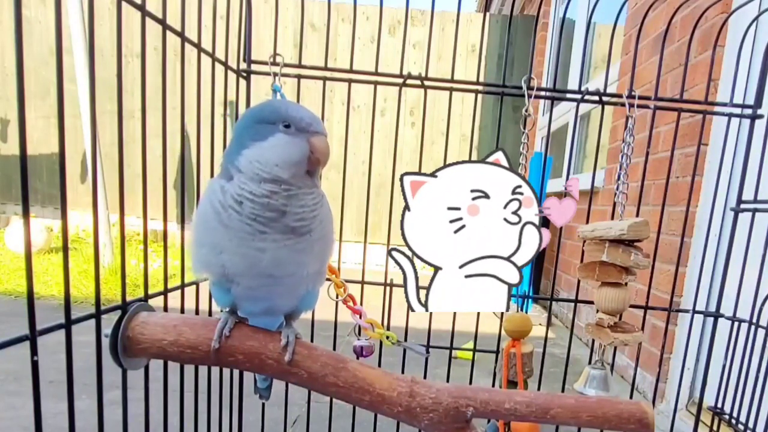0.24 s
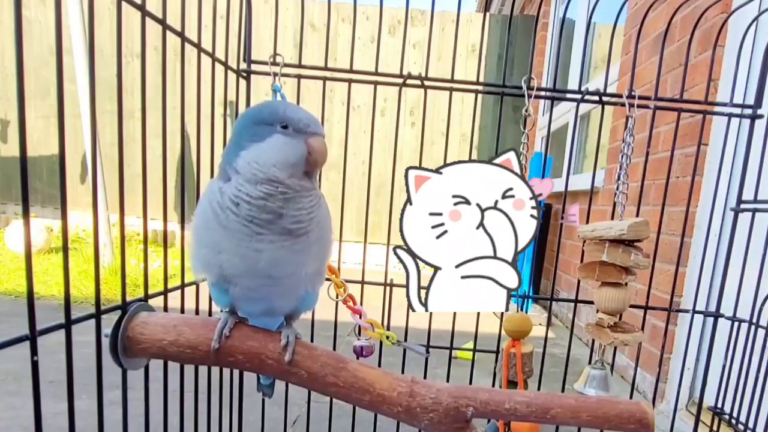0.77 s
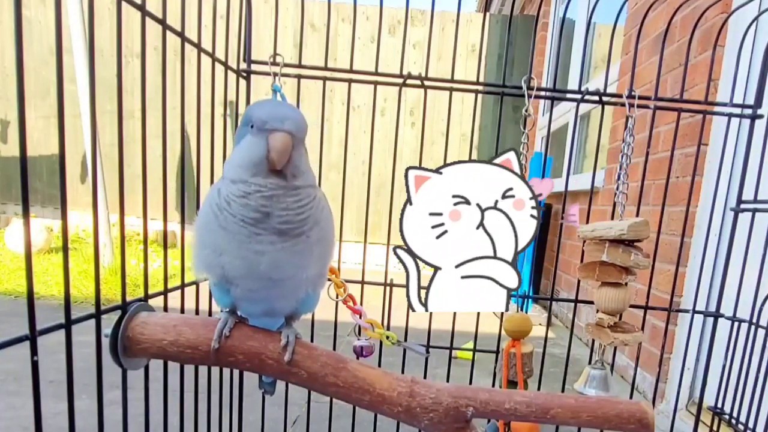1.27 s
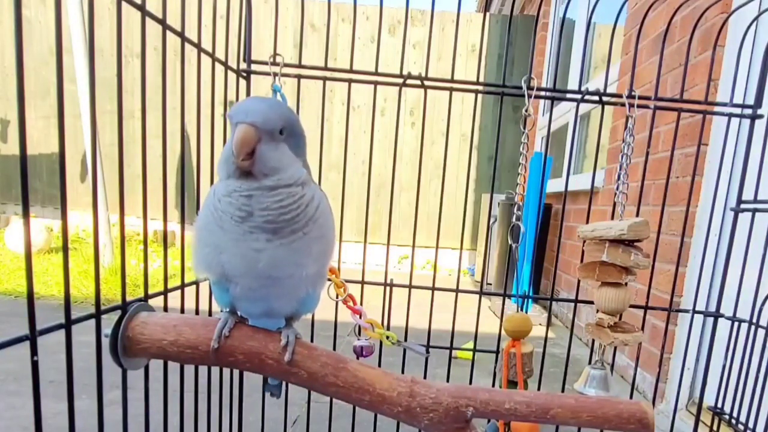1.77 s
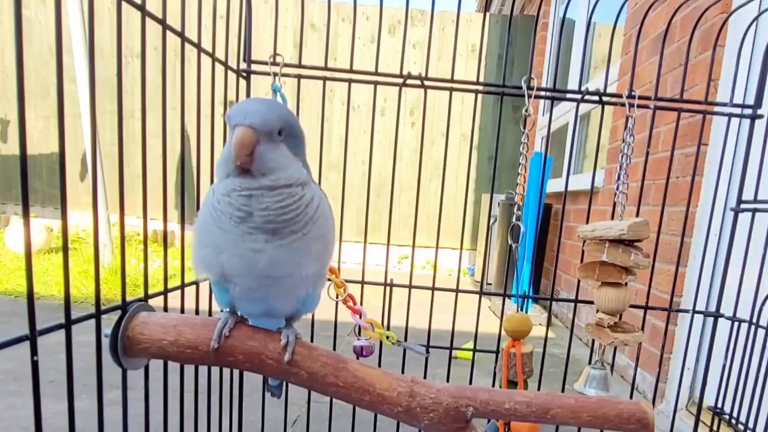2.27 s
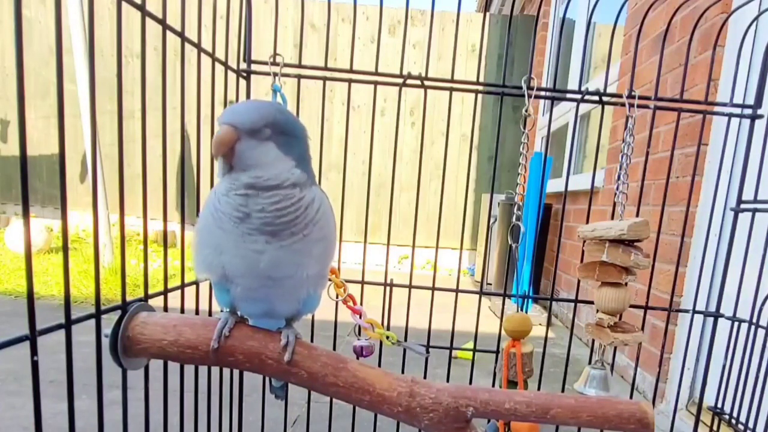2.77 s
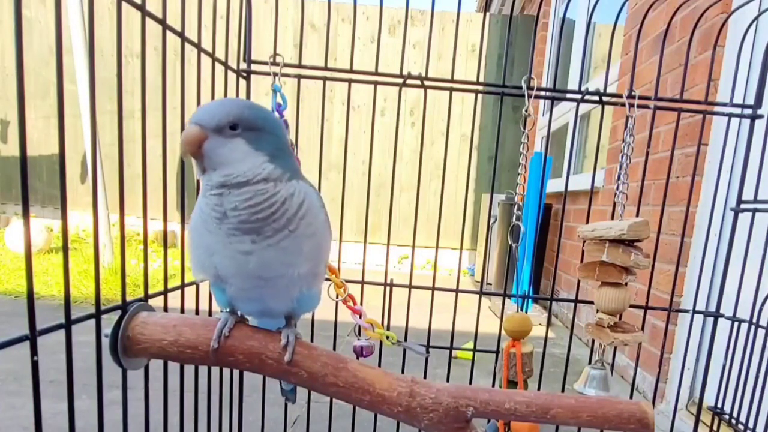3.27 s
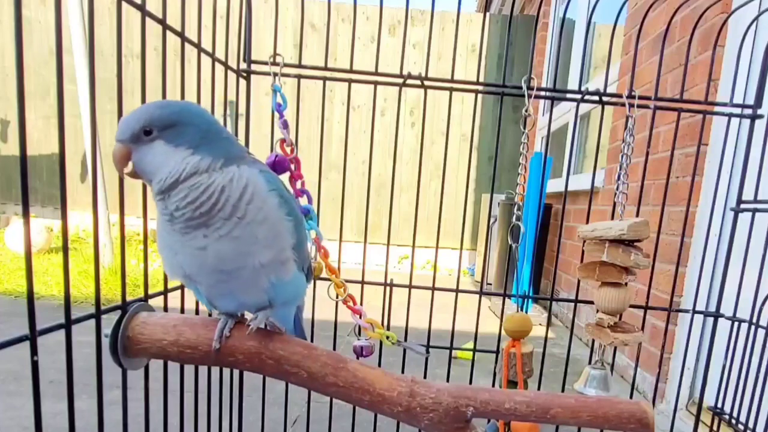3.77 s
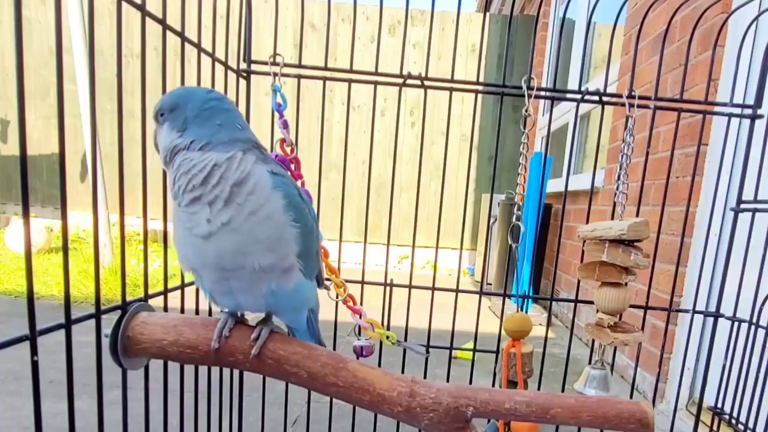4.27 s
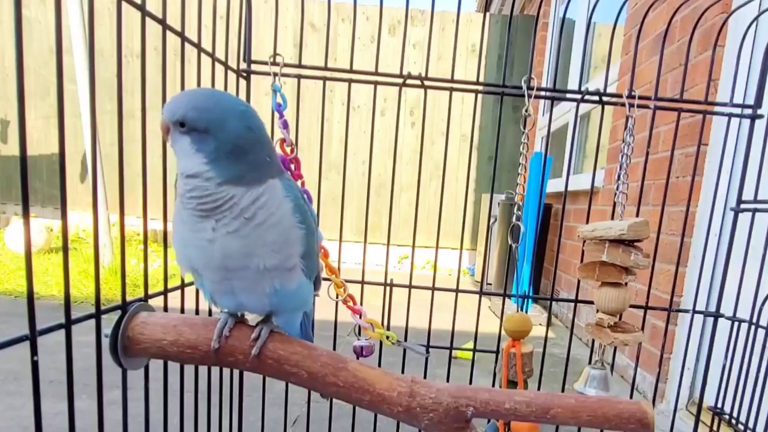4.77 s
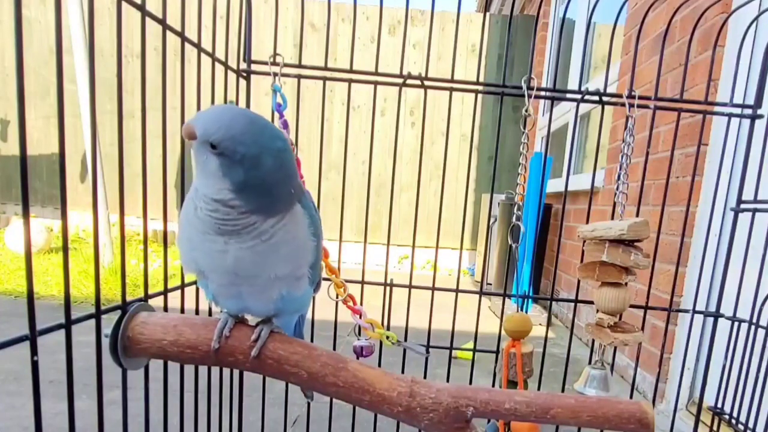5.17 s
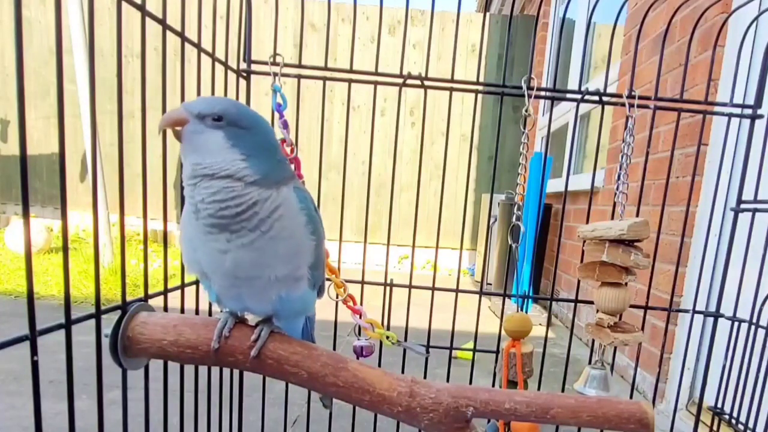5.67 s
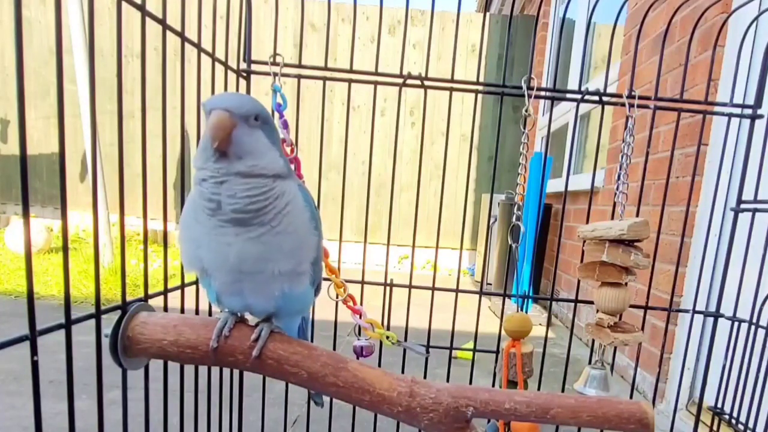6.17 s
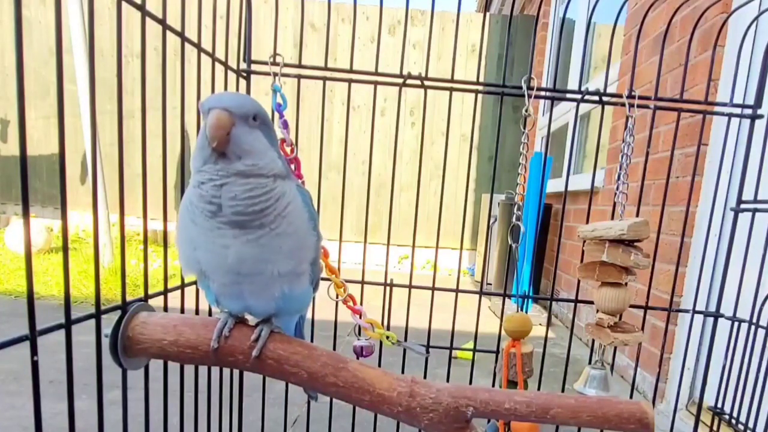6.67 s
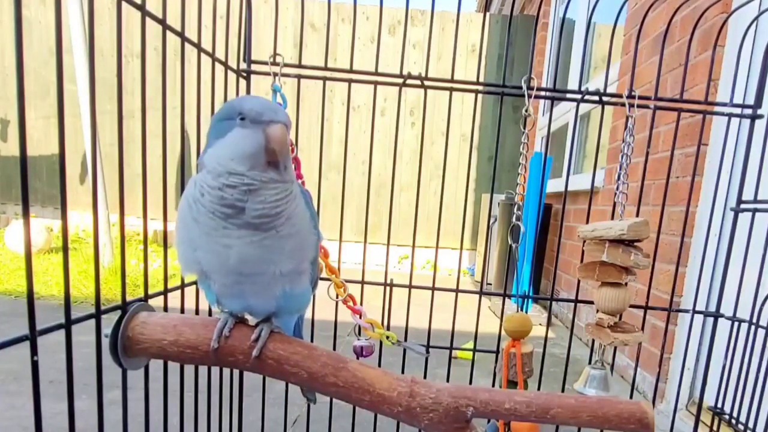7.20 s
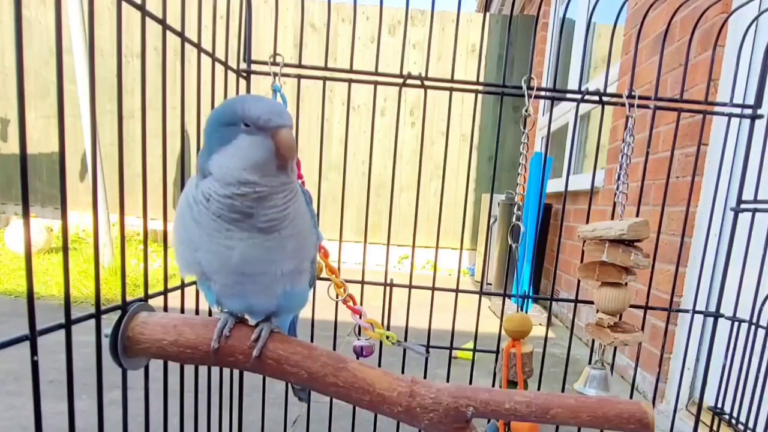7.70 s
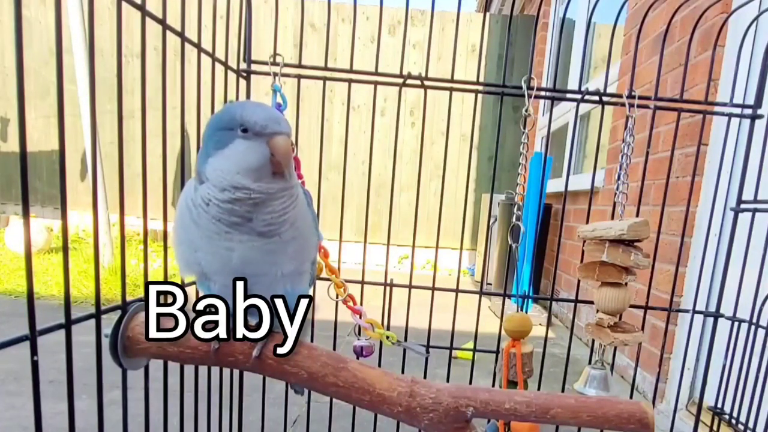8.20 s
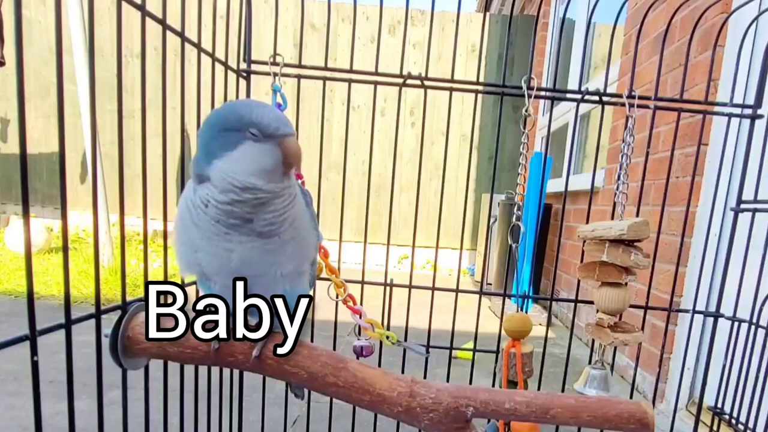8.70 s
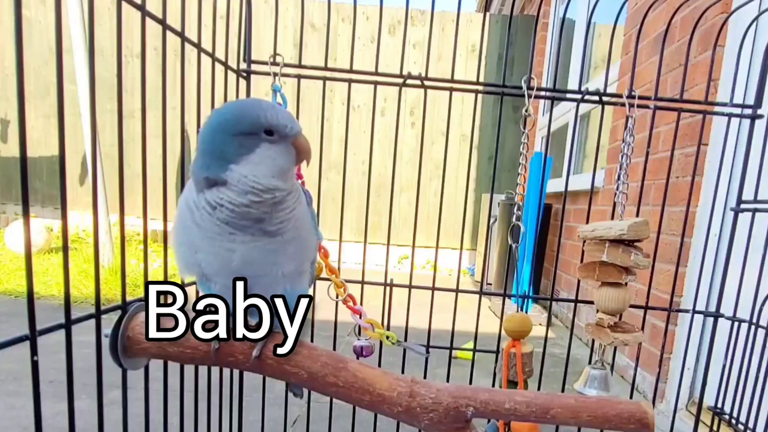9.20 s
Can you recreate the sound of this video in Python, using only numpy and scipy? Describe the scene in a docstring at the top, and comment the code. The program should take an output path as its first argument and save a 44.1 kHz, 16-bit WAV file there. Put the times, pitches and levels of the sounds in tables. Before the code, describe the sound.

A small parrot in an outdoor cage gives a few quick squawks, pauses, then chatters rapidly with raspy notes and beak clicks, ending in a rising call. Sparser squawks, an arched call and a few late croaks follow. A low rumble and wavering far engine lie beneath, with faint whistling birds. Close stereo microphone, bird toward the left, slight yard echo.

```python
"""A low rumble and a far engine open the scene, and at once a small parrot squawks close by.
It chatters, rasps and clicks its beak in a garden cage; the walls of the yard answer faintly.
The voice is a train of harmonics and puffs of noise, filtered by throat, tongue and beak.
The engine is a stack of wavering sines that slows and revs again; the rumble is coloured noise.
Other birds, mostly falling whistles, come from far off, and soft swishes of noise are rustles."""
import sys
import numpy as np
from scipy import signal
from scipy.fft import rfft, irfft, next_fast_len
from scipy.io import wavfile
from scipy.ndimage import uniform_filter1d, map_coordinates

SR = 44100
rng = np.random.default_rng(int(sys.argv[2]) if len(sys.argv) > 2 else 0)


def file_out(sig):
    """Save sig as 16-bit WAV at sys.argv[1]."""
    # one column per channel
    cols = np.atleast_2d(sig).T
    # limit, then scale
    lim = np.clip(cols, -1, 1)
    pcm = np.round(lim * 32767).astype(np.int16)
    wavfile.write(sys.argv[1], SR, pcm)


N = 416744
TIME = np.arange(N) / SR
BAND_LIMIT_HZ = 16200

# colour of the background noise, only its shape counts: f/Hz, level per Hz/dB
BACKGROUND_COLOUR = [(15, -40.5), (25, -22.5), (54, 5.5), (90, -7), (167, -9.5), (196, -15.5), (301, -12.5),
                     (529, -27), (15000, -68.5)]
# level of the background's shared part, before the left-right balance: t/s, level/dB
BACKGROUND_LEVEL = [(0, -44), (3, -47.5), (4.8, -44), (6.6, -53), (7.7, -48.5)]
# far engine, before the left-right balance:
# t/s, firing rate f/Hz, fundamental level/dB, overtones level/dB before the exhaust
ENGINE = [(0, 82.23, -51.5, -74), (1.4, 67, -45, -48.5), (1.95, 64.93, -32.5, -53), (2.65, 60.03, -37, -40),
          (3.3, 56.92, -39, -46), (3.9, 54.1, -60, -51.5), (8.35, 58.12, -54, -58.5),
          (8.55, 48.44, -37, -36), (8.8, 54.64, -51.5, -46), (9.1, 48.9, -54.5, -45),
          (9.33, 62.24, -46, -38)]
# the exhaust's colouring of the overtones: f/Hz, level/dB
EXHAUST = [(100, -4.5), (122, 1), (140, -5.5), (165, -3.5), (195, -11), (260, -16), (430, -29.5)]
# throat and beak for notes, long calls and clicks, only the shape counts: f/Hz, level/dB
THROAT = [(300, -1.5), (600, -3.5), (1000, 0), (1500, 0), (2200, 0), (4200, -1), (5200, -7.5),
          (6300, -17.5), (8000, -5.5), (10000, -16), (12000, -8), (13800, -22.5), (16000, -27.5)]
# tongue and neck: t/s, tongue resonance f/Hz, stretch of the throat's resonances/factor
TONGUE = [(.4, 3400, 1.075), (1.6, 3030, 1.05), (2.4, 3130, 1.0), (2.7, 2300, .98), (3.2, 2340, 1.0),
          (3.8, 2300, 0.93), (4.3, 2284, 0.82), (4.79, 4660, 0.98), (4.84, 2200, 0.92), (5.37, 4330, .97),
          (5.43, 1690, 0.92), (5.68, 1821, 1.07), (6.27, 4100, 1.02), (6.33, 2200, 0.86),
          (7.9, 4300, 1.014), (8, 2682, 1.01)]
# short voiced notes, level at the crest: start t/s, swell t/s, fade t/s,
# start f/Hz, middle f/Hz, end f/Hz, level/dB, settled roughness/0-1,
# body (under about 2 kHz) level/dB, edge (over about 6 kHz) level/dB
NOTES = [ (0.002, 0.0072, 0.016, 1614, 1073, 700, -36.5, 0.17, 14, 8.5),
         (0.207, 0.014, 0.019, 1068, 1436, 614, -26, 0.25, 12, 8),
         (0.400, 0.007, 0.017, 1442, 1039, 580, -22.5, 0.45, 6.5, 8.5),
         (0.555, 0.013, 0.0074, 1626, 1574, 2280, -27.5, 0, 18, -2),
         (1.479, 0.02, 0.035, 726, 818, 865, -31.5, 0.07, 7.5, -5),
         (1.616, 0.025, 0.016, 957, 1064, 1031, -18.5, 0.25, 2, 5),
         (1.753, 0.02, 0.024, 1259, 911, 796, -18, 0.19, 4, 7.5),
         (1.895, 0.027, 0.0075, 511, 635.4, 646, -21.5, 0.43, 3.5, 2.5),
         (2.094, 0.019, 0.027, 822, 716, 616, -25, 0.4, 9.5, 1),
         (2.224, .023, 0.0073, 684, 736, 674, -13, .2, -13, -1),
         (2.398, 0.017, .025, 890, 790, 723, -27, 0.3, 12, 7),
         (2.535, 0.022, 0.0087, 755, 815, 880, -22.5, 0.09, 4.5, 5.5),
         (2.665, 0.0093, 0.03, 1171, 1098, 692, -12, 0.21, -15, .5),
         (2.812, 0.034, 0.011, 631, 709, 686, -25.5, 0.2, 3.5, 4),
         (2.966, 0.0096, 0.028, 679, 629, 556, -21, 0.7, -8, 0),
         (3.794, 0.0045, .020, 1653, 1306, 505, -16.5, 0.38, -2.5, -3.5),
         (4.255, 0.033, .094, 1340, 726, 468.5, -24.5, 0.25, 2, -21),
         (4.603, 0.031, 0.018, 331, 382.3, 345, -28.5, 0.52, 0, -2.5),
         (4.839, 0.0099, 0.081, 708, 603, 531, -29.5, 0.2, 15, 4.5),
         (5.016, 0.045, 0.0077, 491, 572, 573, -31, 0.42, 12.5, 1.5),
         (6.259, 0.04, 0.037, 823, 749, 660, -14, 0.08, -12, -14.5),
         (6.348, 0.022, 0.028, 550.5, 521, 456, -23, 0.17, -5, -10),
         (7.872, 0.011, .032, 301, 215.3, 190, -27.5, 0.93, -2, -6),
         (7.969, 0.013, 0.042, 400.6, 354.7, 278.8, -17, 0.47, -11.5, -4), ]
# where the head points: t/s, lag of the right microphone/ms, left-right level/dB
HEAD = [(0, 0.27, 2), (2.5, 0.27, 7.5), (4.3, 0.34, 4.5), (6.3, 0.29, 9.5), (8, 0.27, 5)]
# how long the yard rings: f/Hz, t60/s
YARD_T60 = [(500, 1.23), (2500, 0.34), (8000, 0.76), (15000, 0.2)]
# colour of the yard's ring, only the shape counts: f/Hz, level/dB
YARD_COLOUR = [(400, 4), (1300, -7.5), (2600, 3), (4500, -1), (7000, -10), (15000, -7)]
# clicks of beak and tongue: t/s, level/dB before a common trim, ring f/Hz
CLICKS = [(0.195, -36, 1900), (0.552, -19.5, 3140), (0.585, -28, 2090), (1.48, -16.5, 774),
          (1.597, -15.5, 1007), (1.744, -14.5, 4190), (2.043, -22.5, 4253), (2.21, -13.5, 2203),
          (2.976, -22.5, 1655), (3.798, -17, 2314), (5.081, -15, 2260), (7.861, -29.5, 2040),
          (7.873, -16.5, 4340)]
# far birds, one call each, level before echoes and mix:
# t/s, length/s, start f/Hz, end f/Hz, level/dB
FAR_BIRDS = [(0.844, 0.19, 4660, 3060, -58.5), (3.642, 0.16, 5360, 5500, -69.5),
             (7.021, .1, 5080, 3915, -72.5), (7.494, .17, 4480, 3156, -55.5),
             (8.31, 0.14, 5500, 4800, -67.5), (8.456, 0.14, 4574, 3216, -52.5),
             (9.349, 0.12, 5044, 4300, -65.5)]
# rustles of feathers and feet: t/s, length/s, low f/Hz, high f/Hz, level/dB
RUSTLES = [(1, 0.24, 580, 2100, -58), (4.499, 0.48, 145, 480, -45.5), (8.643, 0.43, 3104, 15100, -68)]
# shrill falling rasps, level at the crest: start t/s, swell t/s, fade t/s,
# from f/Hz, to f/Hz, level/dB, settled roughness/0-1, edge level/dB
RASPS = [ (2.069, 0.0038, .028, 2157, 1462, -17, 0.56, -8.5),
         (2.351, 0.011, 0.027, 3168, 2132, -15, 0.77, -4), (2.658, 0.003, 0.012, 3800, 3600, -12, 0.5, 1),
         (4.785, .037, .026, 2700, 1990, -21, 0.49, -5.5), (5.347, .024, .006, 3384, 2815, -27.5, .3, -11),
         (5.373, .004, .052, 2255, 1840, -16.5, 0.49, -11.5), ]
# throat and beak as set for a rasp, only the shape counts: f/Hz, level/dB
RASP_THROAT = [(300, -30), (1200, -11), (2200, 0.5), (4200, -2.5), (5200, -3), (6400, -9.5), (8000, -10.5),
               (10000, -16.5), (12000, -16), (13500, -29.5), (16000, -31)]
# drawn-out rising call: t/s, pitch f/Hz, body (under about 2 kHz) level/dB
RISING = [(3.005, 572, -5.5), (3.027, 541, 1.5), (3.049, 447, -4.5), (3.093, 502.4, -6.5),
          (3.127, 715, -10), (3.151, 779, -1), (3.177, 1106, -1.5), (3.209, 1124, 0), (3.236, 1103, -2.5)]
# drawn-out arched call: t/s, pitch f/Hz, body (under about 2 kHz) level/dB
ARCHED = [(5.415, 708, 9.9), (5.425, 787, 4.3), (5.437, 878, 11.6), (5.547, 920, 16.3), (5.569, 961, 8.4),
          (5.607, 959, 10.3), (5.643, 941.4, 9.3), (5.703, 837, 13), (5.719, 808, 8.5), (5.761, 572, 4.5),
          (5.78, 567, 11)]
# voices of the long calls: curve, level/dB, full strength above f/Hz,
# slope under that pitch/dB per octave, release t/s, settled roughness/0-1, edge level/dB
LONG_CALLS = [(RISING, -18, 765, -25.5, 0.052, .13, -2.8), (ARCHED, -20, 920, -25.5, 0.01042, 0.016, 8.8)]

# the syrinx starts with extra roughness (0-1) that decays away
ONSET_ROUGH, SETTLE_S = 0.25, .012
# a softer voice is rounder: dB of body per dB below the crest
ROUNDING = 1
# a syllable swells up to its crest and sinks again, along these powers of time
SWELL_DB_PER_S, SWELL_POWER, FADE_DB, FADE_POWER = -520, 1.4, -8, 1.4


def gain_of(db):
    """Decibels to amplitude."""
    return 10 ** (np.asarray(db) / 20)


def evened(x):
    """Scaled to rms 1."""
    return x / np.sqrt(np.mean(x ** 2) + 1e-20)


def read(points, hz):
    """A spectrum's value at hz, on a log-frequency axis."""
    f, value = np.transpose(points)
    return np.interp(np.log(hz + 1), np.log(f + 1), value)


def follow(rows, t):
    """Every column of a curve table at the times t."""
    s, *columns = np.transpose(rows)
    return [np.interp(t, s, column) for column in columns]


def add(mix, s, sound):
    """Mixes a sound in at s seconds."""
    part = mix[max(round(s * SR), 0):][:len(sound)]
    part += sound[:len(part)]


def lowpass(x, hz):
    """Smooth low-pass without delay."""
    size = next_fast_len(len(x) + 256)
    rolloff = 1 + (np.fft.rfftfreq(size, 1 / SR) / hz) ** 8
    return irfft(rfft(x, size) / rolloff, size)[:len(x)]


def wobble(size, hz):
    """Random motion of rms 1, mostly slower than hz."""
    return evened(lowpass(rng.standard_normal(size), hz))


def ringing(points, size=2048):
    """The causal, minimum-phase impulse response that has this spectrum."""
    log_gain = np.log(gain_of(read(points, abs(np.fft.fftfreq(size, 1 / SR)))))
    spectrum = np.exp(np.conj(signal.hilbert(log_gain)))
    return np.fft.ifft(spectrum).real[:size // 2]


def background(apart_db=-12):
    """Rumble of distant roads, nearly alike at both microphones, thinning out to a faint hiss."""
    colour = ringing(BACKGROUND_COLOUR, size=16384)

    def coloured_noise():
        """White noise through the background's colour."""
        return evened(signal.fftconvolve(rng.standard_normal(N), colour)[:N])

    shared, left, right = (coloured_noise() for _ in range(3))
    level = gain_of(follow(BACKGROUND_LEVEL, TIME)[0])
    return level * (shared + gain_of(apart_db) * np.array([left, right]))


def engine(waver=.008, flutter=0.36, count=7):
    """A far drone: a fundamental and overtones shaped by the exhaust, each wavering on its way."""
    hz, low_db, upper_db = follow(ENGINE, TIME)
    turns = np.cumsum(hz * (1 + waver * wobble(N, 14))) / SR
    drone = np.zeros(N)
    for k in range(1, count + 1):
        db = low_db if k == 1 else upper_db + read(EXHAUST, k * hz)
        level = gain_of(db) * (1 + flutter * wobble(N, 7))
        drone += level * np.sin(2 * np.pi * (k * turns + rng.random()))
    return drone


def resonate(x, hz, width_hz):
    """A moving resonance of gain 1: shifts the curve hz down to zero, smooths, and shifts back."""
    turn = np.exp(2j * np.pi * np.cumsum(hz) / SR)
    r = np.exp(-np.pi * width_hz / SR)
    smoothed = signal.lfilter([1 - r], [1, -r], x / turn)
    return 2 * (turn * smoothed).real


def syrinx(hz, rough, jitter=0.17, jitter_hz=700, breath=1.0, least_air=.02, spread_turns=0.18):
    """Harmonic pulses; a rough voice has uneven cycles and more puffs of air, one per cycle."""
    size = len(hz)
    turns = np.cumsum(hz * (1 + jitter * rough * wobble(size, jitter_hz))) / SR
    k = np.arange(1, BAND_LIMIT_HZ // hz.min() + 1)[:, None]
    # the windpipe smears each pulse: its upper harmonics come out a little later
    lag_turns = spread_turns * (k * hz / 1000) ** 1.5
    harmonics = np.cos(2 * np.pi * (k * turns - lag_turns)) * (k * hz < BAND_LIMIT_HZ)
    pulses = evened(harmonics.sum(0) * np.sqrt(hz))
    puffs = evened((0.35 + np.exp(-(turns % 1) / .25)) * rng.standard_normal(size))
    puffs -= lowpass(puffs, 1.4 * np.median(hz))  # little air noise lies below the pitch
    air = np.clip(breath * rough ** 0.71 + least_air, 0, 1)
    return np.sqrt(1 - air ** 2) * pulses + air * puffs


def syllable(t, hz, level_db, rough, body_db, edge_db, throat, attack_s=0.0044, fade_s=0.0072,
             body_hz=2000, edge_hz=6400, tongue_db=3, tongue_width_hz=280,
             beak_hz=7900, beak_db=-3, beak_width_hz=900):
    """The syrinx sounds through throat, tongue and beak, then takes on its loudness curve."""
    size = len(t)
    rough = np.clip(rough + ONSET_ROUGH * np.exp(-(t - t[0]) / SETTLE_S), 0, 1)
    body_db = body_db + ROUNDING * (level_db.max() - level_db)
    # the neck stretches the throat's resonances; tongue and beak each add one
    tongue_hz, stretch = follow(TONGUE, t)
    tract = ringing([(f * stretch.mean(), db) for f, db in throat])
    voice = signal.fftconvolve(syrinx(hz, rough), tract)[:size]
    voice += gain_of(tongue_db) * resonate(voice, tongue_hz, tongue_width_hz)
    voice += gain_of(beak_db) * resonate(voice, beak_hz * stretch, beak_width_hz)
    # the opening of the beak shifts the balance of body and edge
    body = lowpass(voice, body_hz)
    below_edge = lowpass(voice, edge_hz * stretch.mean())
    voice = body * gain_of(body_db) + below_edge - body + (voice - below_edge) * gain_of(edge_db)
    # level out the short-term power, so that level_db alone sets the loudness
    power = uniform_filter1d(uniform_filter1d(voice ** 2, size=240), size=160)
    voice /= np.sqrt(power + 1e-12)
    ramp = np.clip(np.minimum((t - t[0]) / attack_s, (t[-1] - t) / fade_s), 0, 1)
    fade = np.sin(np.pi / 2 * ramp) ** 2
    return t[0], voice * gain_of(level_db) * fade * (1 + .25 * rough * wobble(size, 200))


def effort(start, swell_s, fade_s, margin_s=.002):
    """One push of air: its times, its progress from 0 to 1, and its dB below the crest."""
    t = np.arange(-margin_s, swell_s + fade_s + 2 * margin_s, 1 / SR)
    before = np.clip(1 - t / swell_s, 0, 1)
    after = np.maximum((t - swell_s) / fade_s, 0)
    sag_db = SWELL_DB_PER_S * swell_s * before ** SWELL_POWER + FADE_DB * after ** FADE_POWER
    return start + t, np.clip(t / (swell_s + fade_s), 0, 1), sag_db


def note(start, swell_s, fade_s, start_hz, middle_hz, end_hz, level_db, rough, body_db, edge_db, throat):
    """A short note: the pitch bends along one parabola during one push of air."""
    t, progress, sag_db = effort(start, swell_s, fade_s)
    bend = np.polyfit([0, .5, 1], [start_hz, middle_hz, end_hz], 2)
    return syllable(t, np.polyval(bend, progress), level_db + sag_db, rough, body_db, edge_db, throat)


def delayed(x, ms):
    """The sound, later by a fixed or moving delay."""
    return map_coordinates(x, [np.arange(N) - ms * SR / 1000], order=3)


def microphones(x, bounce_ms=1.825, left_bounce=0.099, right_bounce=-0.23, bounce_hz=5000):
    """The bird sits to the left; a near surface adds one quick, dull reflection."""
    lag_ms, side_db = follow(HEAD, TIME)
    bounce = delayed(lowpass(x, bounce_hz), bounce_ms)
    left = x + left_bounce * bounce
    right = delayed(x + right_bounce * bounce, lag_ms)
    return np.array([left * gain_of(side_db / 2), right * gain_of(-side_db / 2)])


def cage(x, t60=0.066):
    """Bars and perch scatter the sound for 40 ms, differently for each microphone."""
    t = np.arange(SR // 25) / SR
    hits = rng.standard_normal((2, len(t))) * (rng.random((2, len(t))) < .1)
    taps = hits * gain_of(-60 * t / t60) * (t > .001)
    taps /= np.linalg.norm(taps, axis=1, keepdims=True)
    return signal.oaconvolve(x[None], taps, axes=1)[:, :N]


def yard(x, wall_s=0.097, wall=0.083):
    """Scattered echoes, each band dying at its own speed, and a slap from the house wall."""
    taps = rng.standard_normal((2, SR)) * (rng.random((2, SR)) < 2500 / SR)  # about 2500 a second
    hz, t, bands = signal.stft(taps, SR, nperseg=256)
    bands *= gain_of(read(YARD_COLOUR, hz)[:, None] - 60 * t / read(YARD_T60, hz)[:, None])
    tail = signal.istft(bands, SR, nperseg=256)[1]
    tail /= np.linalg.norm(tail[0])
    tail[:, round(wall_s * SR)] += wall
    return signal.fftconvolve(x[None], tail, axes=1)[:, :N]


def click(s, level_db, hz, throat, ring=.5, trim_db=-6, t60=0.029):
    """A snap of noise dies away in the beak, which rings briefly at one pitch."""
    t = np.arange(SR // 16) / SR
    snap = evened(signal.fftconvolve(rng.standard_normal(len(t)), throat)[:len(t)])
    rise = 1 - np.exp(-t / .0007)
    decay = gain_of(level_db + trim_db - 60 * t / t60)
    return s, (snap + ring * np.sin(2 * np.pi * hz * t)) * rise * decay


def far_birds(harsh=0.084, direct=0.62):
    """Harsh gliding whistles, mostly falling, with an unsteady pitch and strong echoes."""
    out = np.zeros(N)
    for s, length, start_hz, end_hz, db in FAR_BIRDS:
        size = int(length * SR)
        hz = np.linspace(start_hz, end_hz, size) * (1 + harsh * wobble(size, 330))
        whistle = np.sin(2 * np.pi * np.cumsum(hz) / SR)
        add(out, s, gain_of(db) * signal.windows.tukey(size, .5) * whistle)
    return direct * out + yard(out)


def rustles(grain_db=3):
    """Soft grainy swishes of band-limited noise as the bird shifts on its perch."""
    out = np.zeros((2, N))
    for s, length, low_hz, high_hz, db in RUSTLES:
        size = int(length * SR)
        for channel in out:
            hiss = rng.standard_normal(size) * gain_of(grain_db * wobble(size, 115))
            swish = evened(lowpass(hiss, high_hz) - lowpass(hiss, low_hz))
            add(channel, s, gain_of(db) * signal.windows.tukey(size, .6) * swish)
    return out


def rasp(start, swell_s, fade_s, from_hz, to_hz, level_db, rough, edge_db, throat, body_db=-8):
    """A shrill, rough squeeze of the syrinx that slides straight down."""
    t, progress, sag_db = effort(start, swell_s, fade_s)
    hz = from_hz + (to_hz - from_hz) * progress
    return syllable(t, hz, level_db + sag_db, rough, body_db, edge_db, throat)


def long_call(curve, level_db, full_hz, sink_db, release_s, rough, edge_db, throat):
    """A held call: its strength follows its pitch, and it fades at the end."""
    t = np.arange(curve[0][0], curve[-1][0], 1 / SR)
    hz, body_db = follow(curve, t)
    sag_db = sink_db * np.maximum(np.log2(full_hz / hz), 0)
    sag_db += FADE_DB * np.maximum(1 - (t[-1] - t) / release_s, 0)
    return syllable(t, hz, level_db + sag_db, rough, body_db, edge_db, throat)


def parrot():
    """Notes, beak clicks, rasps and long calls of the one bird."""
    out = np.zeros(N)
    for row in NOTES:
        add(out, *note(*row, THROAT))
    for row in CLICKS:
        add(out, *click(*row, ringing(THROAT)))
    for row in RASPS:
        add(out, *rasp(*row, RASP_THROAT))
    for row in LONG_CALLS:
        add(out, *long_call(*row, THROAT))
    return out


def scene():
    """The near bird with its echoes, over the far sounds of the garden."""
    rumble = (engine() + background()) * gain_of([[-1.2], [1.2]])  # leans to the right
    bird = parrot()
    near = gain_of(-1.5) * microphones(bird) + gain_of(-7.5) * cage(bird) + gain_of(-24) * yard(bird)
    return rumble + near + gain_of(1) * far_birds() + rustles()


def record(dry, ceiling=1.0):
    """The loudest peaks round off softly; then the recorder's band limit."""
    rounded = dry / (1 + (dry / ceiling) ** 6) ** (1 / 6)
    band_limit = signal.firwin(511, BAND_LIMIT_HZ, window=("kaiser", 9), fs=SR)
    return signal.oaconvolve(rounded, band_limit[None], "same")


dry = scene()
out = record(dry)
file_out(out)
```